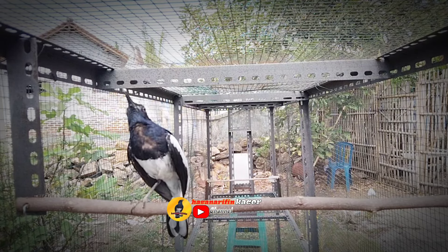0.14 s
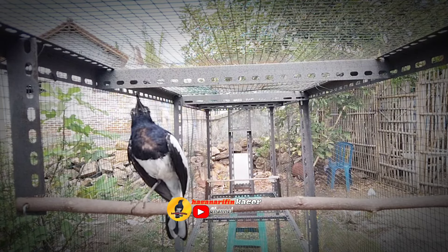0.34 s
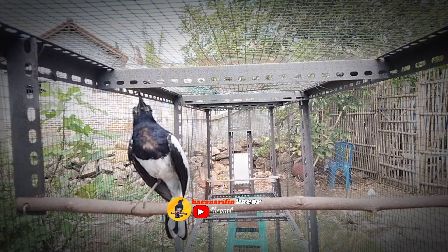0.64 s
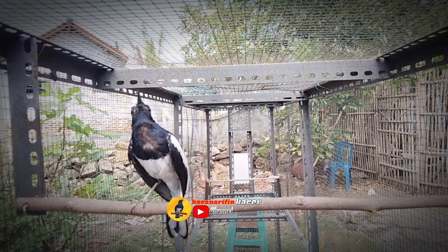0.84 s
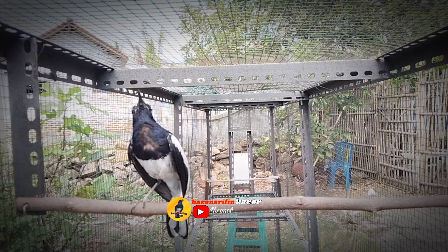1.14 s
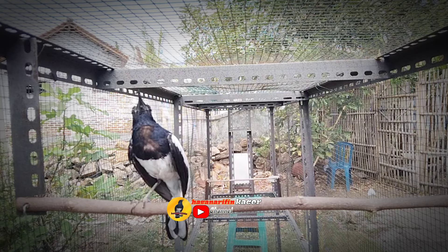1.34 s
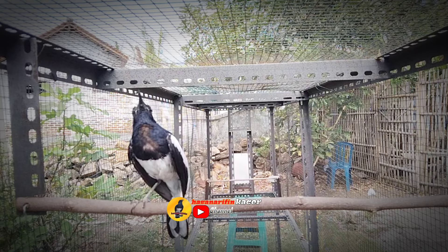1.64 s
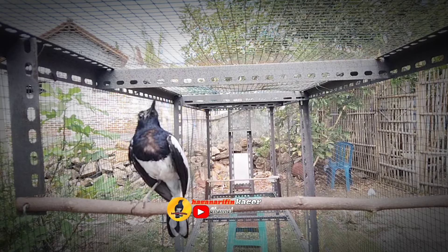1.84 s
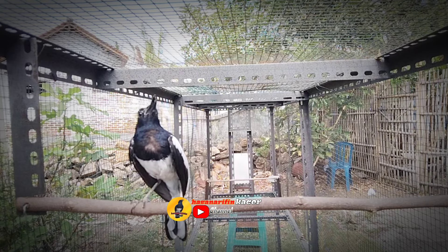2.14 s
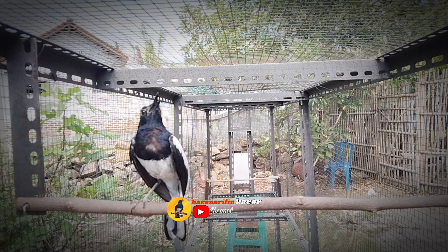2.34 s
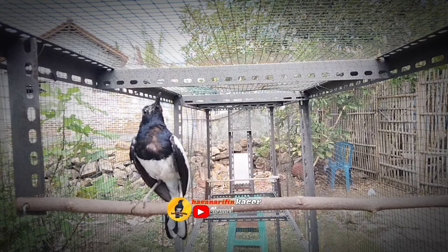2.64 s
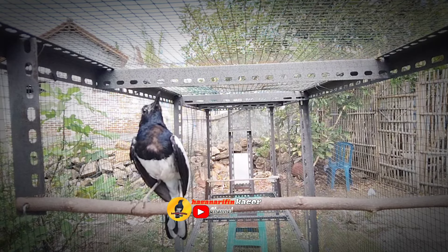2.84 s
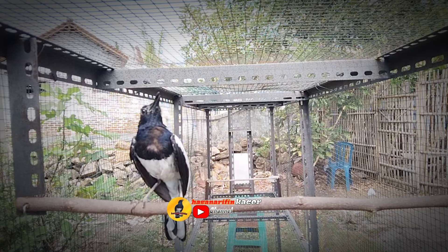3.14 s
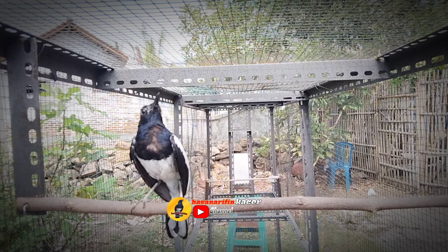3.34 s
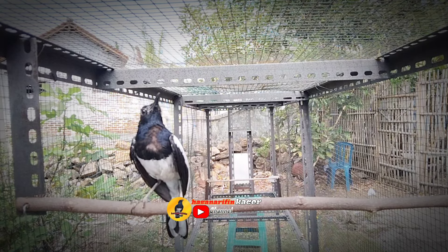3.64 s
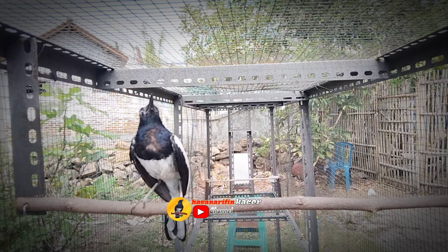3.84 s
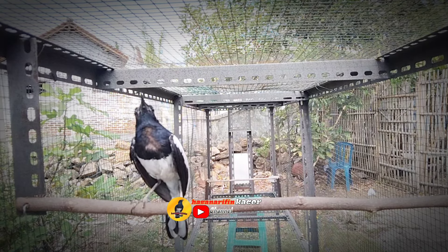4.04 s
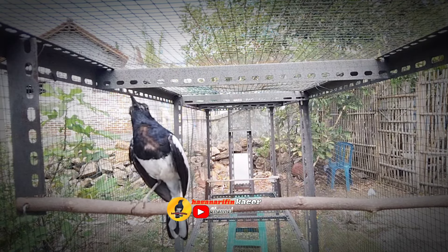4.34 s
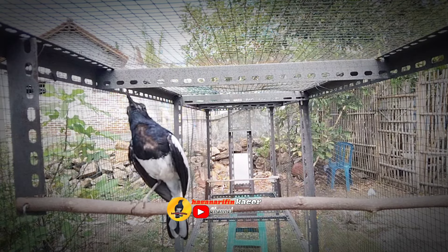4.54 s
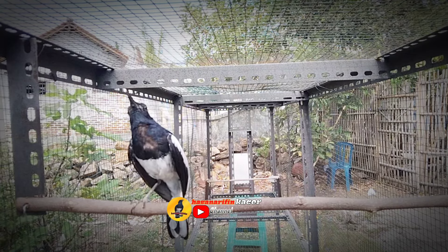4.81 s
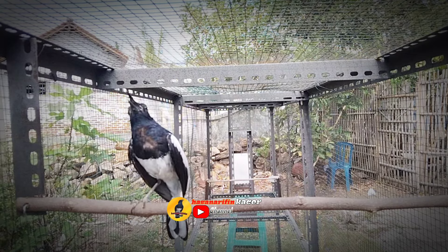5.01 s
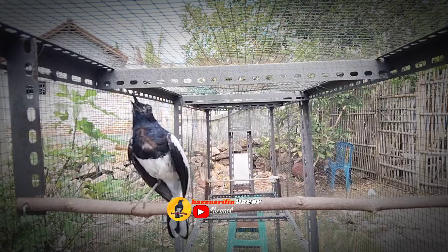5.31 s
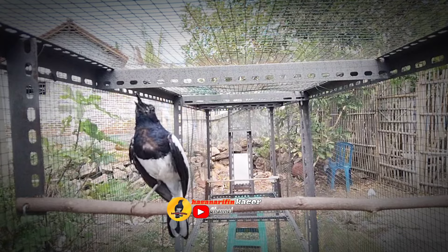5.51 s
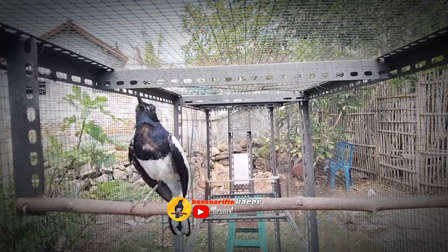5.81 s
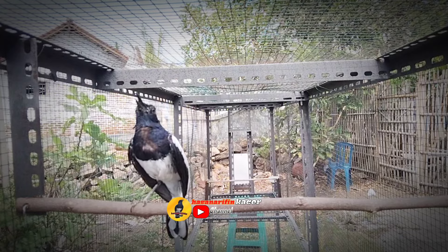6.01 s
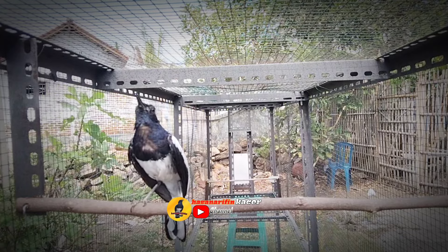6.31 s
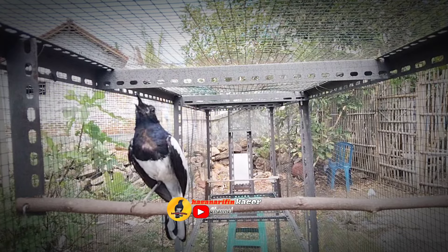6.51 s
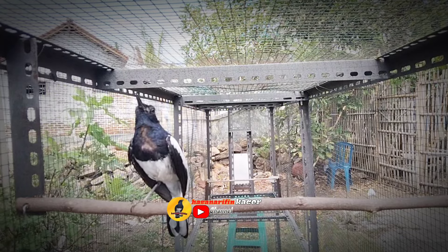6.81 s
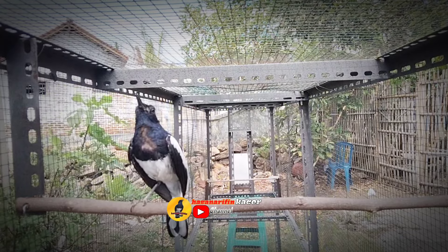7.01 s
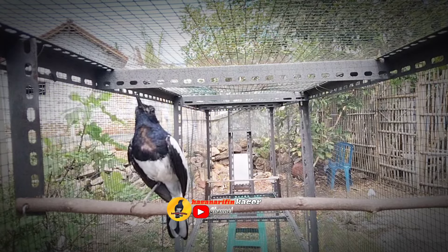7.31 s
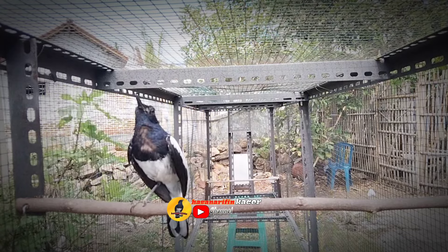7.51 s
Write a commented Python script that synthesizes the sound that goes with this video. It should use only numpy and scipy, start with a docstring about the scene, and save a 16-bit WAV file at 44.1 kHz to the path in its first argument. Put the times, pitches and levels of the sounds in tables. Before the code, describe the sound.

Bright, dry, close birdsong in a quiet yard. One bird strings together varied short notes, some pure and sliding, some reedy, hoarse or fluttering, pausing for most of a second now and then. Behind it are faint thin chirps, longer high whistles from another bird, and dull, blurred distant knocks. After six seconds low wind gusts appear, ending in hard buffets under a last falling note.

```python
"""A songbird sings close to a microphone in an open-air cage; both halves of its voice organ (syrinx) sound,
at times together. Each half is a gliding tone with overtones, and rushing air is filtered noise.
The yard walls answer with noise tails and two plain echoes; farther birds whistle, chirp and twitter as
gliding tones. Dull knocks from afar are short washes of noise, and late on wind buffets the microphone
as low noise and single pushes. Faint filtered noise is the air of the yard."""
import sys
import numpy as np
from scipy import signal
from scipy.fft import rfft, irfft
from scipy.io import wavfile
from scipy.ndimage import uniform_filter1d, minimum_filter1d

SR = 44100
rng = np.random.default_rng(int(sys.argv[2]) if len(sys.argv) > 2 else 0)


def decibels_to_gain(level_db):
    """Convert a level in decibels to a linear amplitude gain (20 dB per decade)."""
    exponent = np.asarray(level_db, float) / 20
    return 10 ** exponent


def pcm_store(signal):
    """Save signal as 16-bit PCM."""
    levels = np.round(np.clip(np.atleast_2d(signal), -1, 1) * 32767)
    wavfile.write(sys.argv[1], SR, levels.astype(np.int16).T)


N = 337806
T = np.arange(N) / SR


def band(x, lo_hz, hi_hz, order=2):
    """Keep only the pitches between two limits (Butterworth band-pass)."""
    sos = signal.butter(order, [lo_hz, min(hi_hz, SR / 2.1)], "band", fs=SR, output="sos")
    return signal.sosfilt(sos, x)


def unit(x):
    """Scale to an average strength (rms) of 1."""
    return x / np.sqrt(np.mean(x ** 2))


def colour(x, points):
    """Raise and lower parts of the spectrum by a few (pitch_hz, level_db) points."""
    hz, db = np.transpose(points)
    log_hz = np.log(np.fft.rfftfreq(N, 1 / SR) + 1)
    return irfft(rfft(x) * decibels_to_gain(np.interp(log_hz, np.log(hz), db)), N)


def walk(rate):
    """Smooth random wander with rms 1; a higher rate wanders faster."""
    k = int(SR / rate)
    return unit(uniform_filter1d(uniform_filter1d(rng.standard_normal(N), k), k))


def track(notes):
    """Pitch, amplitude and note number over time, with the corners rounded."""
    edge_s, attack_s = .004, .008
    k = int(SR * edge_s)
    s, hz, db = np.concatenate(notes).T
    starts = np.array([note[0][0] for note in notes])
    ends = np.array([note[-1][0] for note in notes])
    which = np.clip(np.searchsorted(starts - edge_s, T) - 1, 0, None)
    opening = (T - starts[which]) / attack_s + .5
    closing = (ends[which] - T) / edge_s + 1
    gate = np.clip(np.minimum(opening, closing), 0, 1)
    pitch_hz = uniform_filter1d(uniform_filter1d(np.interp(T, s, hz), k), k)
    level_db = uniform_filter1d(np.interp(T, s, db), k)
    return pitch_hz, gate ** 2 * decibels_to_gain(level_db), which


def turn(hz):
    """Phase of a gliding tone: the pitch added up over time."""
    return 2 * np.pi * np.cumsum(hz) / SR


def space(x, t60_s, top_hz, rise_s):
    """Blurred tail of many reflections: dying noise of unit energy that first swells over rise_s."""
    t = T[:SR]
    noise = band(rng.standard_normal(SR), 450, top_hz, order=1)
    tail = noise * np.exp(-np.log(1000) * t / t60_s) * np.clip(t / rise_s, 0, 1)
    return signal.fftconvolve(x, tail / np.sqrt(np.sum(tail ** 2)))[:N]


# tone colour of the yard's faint air: pitch_hz, relative level_db (per Hz)
YARD_COLOUR = [(25, -29), (80, -8.5), (300, -20), (700, -26), (3500, -21), (12000, -47)]


def yard():
    """Faint air of the yard: coloured noise whose level wavers slowly."""
    level_db = -65.5 + 3.5 * walk(4)
    return decibels_to_gain(level_db) * unit(colour(rng.standard_normal(N), YARD_COLOUR))


# a farther bird's whistles: start_s, length_s, first_hz (after the scoop), slid_hz (after the slide), last_hz,
# level_db (before the random swell and the yard's tail)
WHISTLES = [(-.05, .19, 3935, 4040, 3968, -44), (2.216, 0.2, 3900, 3770, 3757, -32),
            (3.443, 0.33, 4420, 4145, 4372, -46), (5.855, 0.28, 3830, 3704, 3783, -43.5),
            (6.891, 0.24, 4670, 4320, 4267, -48), (7.554, .16, 4270, 4270, 4260, -53)]


def whistles():
    """Tones that scoop up, slide and fade, with a faint octave on the lower ones and a yard tail."""
    scoop_s, scoop_db, scoop_pitch = .04, -16, .88
    slide_share, fade_db = .68, -6  # share of the time after the scoop, level change by the end
    notes = []
    for s, length, first_hz, slid_hz, last_hz, db in WHISTLES:
        slid_s = s + scoop_s + slide_share * (length - scoop_s)
        notes.append([(s, scoop_pitch * first_hz, db + scoop_db), (s + scoop_s, first_hz, db),
                      (slid_s, slid_hz, db), (s + length, last_hz, db + fade_db)])
    hz, size, _ = track(notes)
    phase = turn(hz * (1 + .004 * walk(60)))
    octave = decibels_to_gain(-15.5) * (hz < 4500) * np.cos(2 * phase)
    whistle = size * decibels_to_gain(2.0 * walk(40)) * (np.cos(phase) + octave)
    return whistle + decibels_to_gain(-5) * space(whistle, .5, 8300, .02)


# the steady part of each syllable, drawn out or cut short by the bird:
# from_s, to_s (after the start, at normal speed)
HELD = {"hook": (.048, .09), "duet": (.025, .076), "swoop": (.14, .17), "snap": (0, .03),
        "fall": (.036, .1), "drop": (.056, .108), "warble": (.031, .1), "harsh": (.06, .134),
        "pair": (.067, .125), "tick": (.014, .045), "loop": (.047, .09)}


def clock(row, after_s):
    """When a point of a syllable's shape falls due in one performance of it."""
    start, kind, slow, longer = row[:4]
    return start + slow * after_s + longer * np.interp(after_s, HELD[kind], (0, 1))


def bend(pitch, after_s):
    """Pitch factor of one performance: constant, or a curve through the syllable."""
    return np.interp(after_s, *np.transpose(pitch)) if np.ndim(pitch) else pitch


# strength of the first overtone against the basic tone, near 0 reedy, far below 0 a pure whistle:
# first_half_db, second_half_db (where that half sings)
REEDY = {"hook": (-24,), "duet": (7, -21), "swoop": (-24.5,), "snap": (-15, -11), "fall": (-29.5,),
         "drop": (-26.5,), "warble": (-25,), "harsh": (1.4, -15), "pair": (-1.1, -18.5), "tick": (8.3,),
         "loop": (-22.5,)}
# the song: start_s, syllable, slowness (times), steady part longer by (s), pitch (times), added level_db;
# a bent syllable has a pitch curve instead: after_start_s, pitch (times)
SONG = [(0.086, "hook", 0.9, 0.0068, 1.01, -1.7), (.326, "duet", 1.01, -0.0037, .99, -4.5),
        (.585, "swoop", 1, 0.0018, 1.0026, 0.5), (0.886, "snap", 1, 0.0014, 0.99, 1),
        (1.117, "drop", 1, -0.0034, .975, -1.5), (1.336, "warble", 1.03, -0.0036, [(0, .93), (.018, 1.1),
        (.095, .96), (.11, 0.94), (.138, 1), (.16, .94), (.2, .97)], 0.5),
        (2.183, "harsh", 0.85, -0.027, [(.008, 1.11), (.03, 1), (.085, 1.04), (.15, .96)], 3),
        (2.382, "pair", 0.92, .001, 1.012, -3), (2.52, "pair", .8, 0.021, [(0, 0.8), (.03, .93),
        (.067, 0.95)], -3), (2.831, "drop", 1.03, -0.0045, 1.015, 0),
        (3.102, "warble", 1, -0.0026, [(.03, .97), (.16, 1.02), (.2, .98)], 2),
        (3.972, "harsh", 0.94, 0.015, 0.99, 0), (4.28, "fall", 0.91, -0.0018, 1.02, 2),
        (4.543, "tick", .99, -0.0059, 1.03, 0.3), (4.784, "hook", 1, .006, [(.032, .94), (.048, .99),
        (.068, .94), (.101, .94), (.109, 1.1)], -1.5), (5.025, "duet", 0.99, -0.0061, [(0, .93), (.1, 1.05),
        (.135, 1.01)], -0.5), (5.296, "swoop", .87, 0.11, 1.0073, -2),
        (5.795, "fall", 0.79, 0.0011, 0.97, -1.5), (6.013, "warble", 0.9, 0.0098, [(.03, 1.04), (.16, .96),
        (.2, 1.06)], 3), (6.353, "loop", 1, -0.0045, 1.013, -1),
        (6.598, "tick", 0.74, 0.0076, [(.035, 0.99), (.047, .78)], 1.5),
        (7.446, "fall", 0.88, 0.0039, .99, 2.5)]


def sung(shapes, half):
    """Pitch, amplitude and reediness of one syrinx half through the song."""
    rows = [row for row in SONG if row[1] in shapes]
    notes = []
    for row in rows:
        pitch, level_db = row[4:6]
        notes.append([(clock(row, s), bend(pitch, s) * hz, level_db + db) for s, hz, db in shapes[row[1]]])
    hz, size, note = track(notes)
    return hz, size, np.array([REEDY[row[1]][half] for row in rows], float)[note]


def passages(rule):
    """Start, end, slowness and settings of a rule, wherever its syllables are sung."""
    found = []
    for row in SONG:
        if row[1] in rule:
            from_s, to_s, *settings = rule[row[1]]
            found.append((clock(row, from_s), clock(row, to_s), row[2], *settings))
    return found


# fluttering passages: from_s, to_s (after the start), rate_hz (all at normal speed),
# pitch swing (0-1, second half; the first half swings 0.6 of it), level swing_db (second half only)
FLUTTER = {"harsh": (.016, .17, 90, .032, 4), "loop": (.047, .117, 62, .03, 0)}


def flutter():
    """Regular waver of pitch and level, slightly uneven in time."""
    ripple, throb_db = np.zeros((2, N))
    for start, end, slow, hz, depth, db in passages(FLUTTER):
        wave = np.sin(2 * np.pi * hz / slow * (T - start) + .8 * walk(30)) * (T > start) * (T < end)
        ripple = ripple + depth * wave
        throb_db = throb_db + db * wave
    return ripple, throb_db


# rattling starts: first_jump_s, end_s (after the start), rate_hz (all at normal speed), pitch swing (0-1)
RATTLE = {"fall": (0.011, .042, 82, .43), "drop": (0.01, .042, 98, .3)}


def rattle():
    """The membrane stalls, jumps up in pitch and slides back, less so as the note settles."""
    swing, flip = np.zeros((2, N))
    for jump, end, slow, hz, depth in passages(RATTLE):
        fade = np.clip((end - T) / 0.018, 0, 1) * (T > jump - 2 / hz)
        cycle = np.maximum(hz / slow * (T - jump), -.5)
        wave = uniform_filter1d((cycle > 0) * np.exp(-(2.2 * (cycle % 1)) ** 2), size=60)
        swing = swing + depth * fade * wave
        # a brief pulse in each cycle, just after the jump
        flip = flip + fade * np.exp(-(((cycle + 0.42) % 1 - .5) / 0.025) ** 2)
    return swing, flip


# hoarse passages: from_s, to_s (after the start, at normal speed),
# rough pitch scatter (0-1, first half; the second half scatters 0.59 of it)
RASP = {"snap": (.012, .032, .04), "harsh": (.006, .12, .02), "pair": (.001, .034, .05),
        "tick": (.03, .058, .035), "duet": (.062, .125, .026), "hook": (.098, .114, .02),
        "fall": (.004, .032, .03), "drop": (.004, .034, .03)}


def rasp():
    """How strongly the pitch scatters at random in the hoarse passages."""
    scatter = np.zeros(N)
    for start, end, _, amount in passages(RASP):
        scatter = scatter + amount * (T > start) * (T < end)
    return scatter


# overtones from the second multiple up: level_db (on a fully reedy note), share of the reediness (0-1)
OVERTONES = [(0, 1), (-15.5, 0.62), (-22.5, 0.86), (-21, 0.9), (-25, 0.83)]


def overtones(phase, hz, reedy_db):
    """Whole multiples of one membrane's pitch, stronger on reedy notes; those too high are left out."""
    out = np.zeros(N)
    for k, (db, share) in enumerate(OVERTONES, 2):
        out = out + decibels_to_gain(db + share * reedy_db) * (k * hz < SR / 2.6) * np.cos(k * phase)
    return out


# tones of both halves together: multiple of the second half, multiple of the first half
MIXES = [(1, 1), (1, 2), (1, -1), (2, -1), (2, 1), (-1, 3)]
# their strengths, in the same order: level_db (before both halves' loudness and the throat)
MIX_DB = [-6, -13.5, -9.5, -5.5, -14, -15.5]


def mixed_tones(a, b):
    """Sum and difference tones where the two membranes beat together."""
    return sum(decibels_to_gain(db) * np.cos(m * b + n * a) for (m, n), db in zip(MIXES, MIX_DB))


# throat resonances: pitch_hz, level_db
THROAT = [(3500, -8), (5300, 5), (6300, -5), (8200, 3), (10000, -10.5)]
# syllables of the first syrinx half: after_start_s, pitch_hz, level_db (before the song's own changes)
LEAD = { "hook": [(0.0, 3830, -26.5), (.018, 4580, -20), (.032, 4710, -11), (.048, 4010, -6),
        (.068, 3994, -2), (.09, 4131, -3), (.101, 3920, -4), (.109, 2920, -8.5), (.115, 2965, -27.5)],
        "duet": [(0.0, 2580, -39), (.02, 2720, -25), (.055, 2840, -16.5), (.09, 3050, -13.5),
        (.118, 3280, -24)], "swoop": [(0.0, 6554, -11), (.078, 6122, -10), (.106, 5686, -3.5),
        (.14, 5388, -5), (.17, 5317, -7), (.208, 5593, -7), (.23, 6306, -13), (.252, 6430, -15),
        (.27, 6783, -16.5), (.28, 6480, -23)], "snap": [(0.0, 7244, -2), (.01, 6950, -9), (.018, 5243, -16),
        (.028, 5110, -15), (.033, 4527, -15)], "fall": [(0.0, 2384, -21), (.018, 2310, -13),
        (.036, 2320, -6.5), (.06, 1983, -10.5), (.1, 1800, -18.5), (.118, 1721, -34)],
        "drop": [(0.0, 2372, -21), (.018, 2328, -9), (.038, 2328, -8.5), (.056, 1872, -10.5),
        (.075, 1850, -16.5), (.108, 1894, -23), (.12, 1774, -30.5)], "warble": [(0.0, 2756, -20),
        (.018, 2094, -10.5), (.031, 2643, -11.5), (.083, 2669, -14.5), (.1, 2850, -17), (.125, 3398, -3),
        (.138, 3268, -5), (.156, 2330, -20), (.166, 2260, -12), (.185, 2762, -14), (.198, 2897, -10.5),
        (.218, 2650, -23.5)], "harsh": [(0.0, 1723, -23.5), (.008, 2662, -21), (.02, 3146, -12),
        (.04, 3260, -8), (.143, 3540, -38.5)], "pair": [(0.0, 2695, -20.5), (.02, 2760, -14.5),
        (.03, 3040, -9.5), (.04, 3128, -15)], "tick": [(0.0, 3088, -15.5), (.014, 3028, -11.5),
        (.036, 2566, -19.5), (.047, 3244, -24.5), (.058, 3373, -34.5)], "loop": [(0.0, 1921, -25),
        (.021, 2092, -7.5), (.032, 2693, -14.5), (.039, 2276, -3), (.047, 1772, -7.5), (.067, 1759, -11),
        (.092, 1862, -9), (.117, 1680, -19.5)], }
# what the second half adds to some syllables: after_start_s, pitch_hz, level_db (likewise)
DESCANT = { "duet": [(.076, 5345, -12), (.135, 5300, -1), (.175, 4930, -10.5), (.19, 4940, -20)],
           "snap": [(.007, 5793, -13), (.014, 5180, -14), (.023, 3390, -16.5)], "harsh": [(.03, 4400, -24),
           (.046, 5790, -1.5), (.064, 5487, 0.5), (.085, 5110, -11.5), (.12, 4960, -20), (.14, 5167, -14.5),
           (.168, 5166, -20)], "pair": [(.029, 3532, -2.5), (.033, 4400, 4.5), (.04, 4658, -19.5),
           (.047, 4170, 5), (.067, 3620, -3), (.1, 3535, -8.5), (.125, 3700, -32)], }


def bird():
    """Two syrinx membranes, each a gliding tone with overtones by reediness, plus rushing air."""
    ripple, throb_db = flutter()
    swing, flip = rattle()
    scatter = rasp()
    hz_a, size_a, reedy_a_db = sung(LEAD, 0)
    hz_b, size_b, reedy_b_db = sung(DESCANT, 1)
    a = turn(hz_a * (1 + swing + .6 * ripple + .007 * walk(150) + scatter * walk(1500)))
    b = turn(hz_b * (1 + ripple + 0.0036 * walk(260) + 0.59 * scatter * walk(1500)))
    # each rattle pulse dips the level and makes the tone reedier
    size_a = size_a * decibels_to_gain(2.1 * walk(80) - 18 * flip)
    size_b = size_b * decibels_to_gain(throb_db + 1.6 * walk(70))
    reedy_a_db = reedy_a_db + 12 * flip
    # air rushing past the membranes, more on reedy notes of the first half
    hiss = unit(band(rng.standard_normal(N), 2000, 8500, order=4))
    air = hiss * (decibels_to_gain(.3 * reedy_a_db - 34) * size_a + decibels_to_gain(-40) * size_b)
    # with both halves open more air escapes, as a low puff
    puff = decibels_to_gain(-19.5) * size_a * size_b * unit(band(rng.standard_normal(N), 110, 3800, order=1))
    # the first half's overtones rise a touch more steeply than its basic tone, and wander in level
    first = size_a ** 1.046 * decibels_to_gain(3.3 * walk(45)) * overtones(a, hz_a, reedy_a_db)
    second = size_b * overtones(b, hz_b, reedy_b_db)
    # mixed tones need both halves loud
    both = (size_a * size_b) ** 0.81 * mixed_tones(a, b)
    rich = colour(first + second + both, THROAT)
    return size_a * np.cos(a) + size_b * np.cos(b) + rich + air + puff


def walls(song):
    """Yard walls answer the song: two blurred tails, a single far echo and a single near one."""
    far, near = int(.238 * SR), int(.011 * SR)  # delays
    out = decibels_to_gain(-20.5) * space(song, 0.29, 7000, 0.01) + decibels_to_gain(-34.5) * space(song, 0.48, 7300, 0.39)
    out[far:] += decibels_to_gain(-41) * band(song, 4400, 6400, order=3)[:N - far]
    out[near:] += decibels_to_gain(-26) * band(song, 2100, 13000)[:N - near]
    return out


# a third bird's thin chirps: start_s
CHIRP_STARTS = [.22, 1.384, 3.32, 4.376, 5.551, 6.489, 7.559]
# shape of one chirp: after_start_s, pitch_hz, level_db (before it is lowered in the mix)
CHIRP_SHAPE = [(0.0, 6170, -49), (.015, 7100, -29), (0.033, 5900, -43.5)]
# a fourth bird's twitters: start_s
TWITTER_STARTS = [7.126, 7.178]
# shape of one twitter: after_start_s, pitch_hz, level_db (before it is lowered in the mix)
TWITTER_SHAPE = [(0.0, 4101, -51.5), (.006, 4732, -48), (.027, 5050, -49.5), (.042, 3596, -48)]


def chirps_and_twitters():
    """Short gliding pure tones of two farther birds, with nearly as much yard tail as direct sound."""
    notes = []
    for starts, shape in ((CHIRP_STARTS, CHIRP_SHAPE), (TWITTER_STARTS, TWITTER_SHAPE)):
        notes += [[(s + t, hz, db) for t, hz, db in shape] for s in starts]
    hz, size, _ = track(sorted(notes))
    chirp = size * np.cos(turn(hz))
    return decibels_to_gain(-5.0) * chirp + decibels_to_gain(-5.5) * space(chirp, 0.37, 9700, 0.012)


# distant dull knocks: time_s (each begins 0.02 s sooner), relative level_db,
# guide pitch_hz (resonances scatter around a somewhat higher one)
KNOCKS = [(.36, -53.5, 940), (0.88, -54, 967), (1.956, -51.5, 841), (3.054, -54.5, 683),
          (3.552, -53.5, 677), (4.63, -61.5, 784), (5.103, -55.5, 893), (5.45, -60.5, 1050),
          (5.709, -58, 810), (5.905, -48, 609), (6.234, -50, 770), (6.582, -49.5, 709),
          (6.906, -47.5, 593.6), (7.338, -54.5, 725)]


def knocks():
    """Each knock stirs nine hollow resonances, each swelling and dying in its own time."""
    out = np.zeros(N)
    t = T[:SR // 2]
    spreads = rng.standard_normal((len(KNOCKS), 9, 2))
    for (s, db, hz), spread in zip(KNOCKS, spreads):
        wash = 0
        for pitch, late in spread:
            f = max(hz * np.exp(0.24 + .27 * pitch), 480)
            rise_s = 0.062 * np.exp(late / 2)
            noise = unit(band(rng.standard_normal(len(t)), f * .95, f * 1.05))
            wash = wash + noise * t / rise_s * np.exp(-(t / rise_s) ** 1.465)
        i = int((s - .02) * SR)
        out[i:i + len(t)] += (decibels_to_gain(db + 1.0) * wash)[:N - i]
    return out


# strength of the wind: time_s, level_db (before its lumps)
WIND = [(5.76, -98), (5.81, -43.5), (6.04, -61.5), (6.25, -35.5), (6.36, -45), (6.6, -41.5), (6.89, -26),
        (7.04, -49), (7.17, -24), (7.3, -42.5), (7.38, -17), (7.66, -28)]
# its hardest single buffets: time_s, peak level_db (before the microphone)
BUFFETS = [(7.386, -11.5), (7.507, -12.5), (7.568, -6), (7.651, -9)]


def wind():
    """Eddies push the diaphragm: lumpy low noise, brighter when strong, and single buffets."""
    size = decibels_to_gain(np.interp(T, *np.transpose(WIND), left=-90))
    lumps = rng.standard_normal(N) * decibels_to_gain(5 * walk(30))
    low = unit(band(lumps, 76, 160, order=3))
    brighter = 0.97 * size * unit(band(lumps, 98, 315, order=4))
    out = size * (low + brighter)
    for s, db in BUFFETS:
        u = ((T - s) / 0.0014) ** 2
        out = out + decibels_to_gain(db) * (1 - u) * np.exp(-u / 2)  # push with a pull on either side
    return out


def scene():
    """Bird, its echoes and the surroundings."""
    song = bird()
    mix = song + walls(song) + whistles() + chirps_and_twitters() + knocks() + wind() + yard()
    return mix[None]


# microphone with a treble resonance: pitch_hz, level_db
MICROPHONE = [(7000, 2), (11500, 4.5), (13000, 19.5), (15500, 2.5)]


def microphone(x):
    """The microphone's own tone colour, with its resonance in the treble."""
    return colour(x, MICROPHONE)


def limit(x, size=88):
    """Look-ahead limiter: the gain eases down around peaks that would pass full scale."""
    need = minimum_filter1d(1 / np.maximum(np.abs(x), 1), 2 * size)
    return np.clip(x * uniform_filter1d(need, 2 * size), -1, 1)


def low_pass(x):
    """Removes everything above the highest recorded frequency."""
    return signal.sosfilt(signal.butter(12, 15960, fs=SR, output="sos"), x)


def record(dry):
    """The scene through the microphone and a limiter."""
    mix = limit(microphone(dry))
    return low_pass(mix)


dry = scene()
out = record(dry)
pcm_store(out)
```